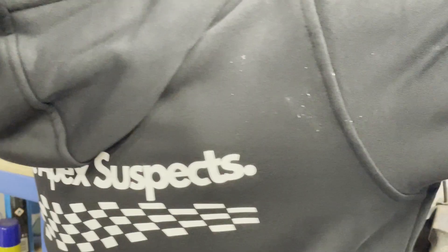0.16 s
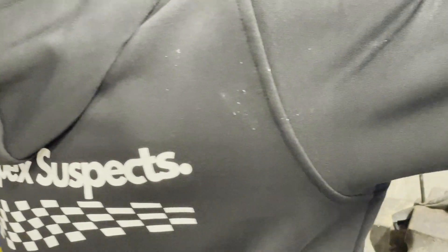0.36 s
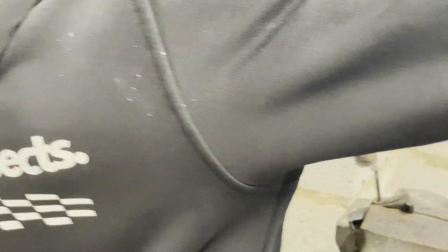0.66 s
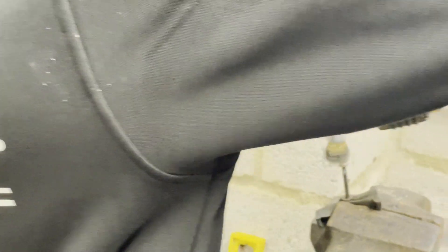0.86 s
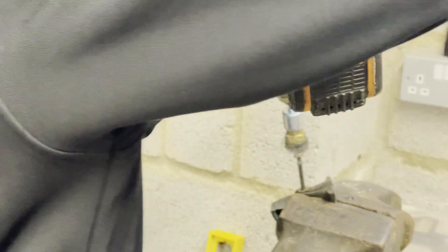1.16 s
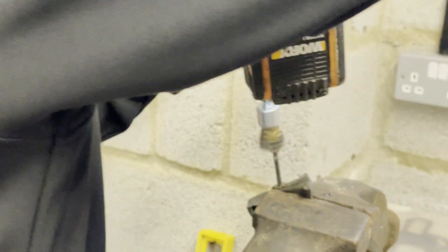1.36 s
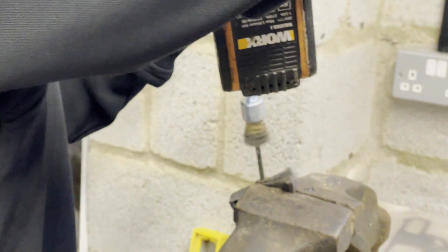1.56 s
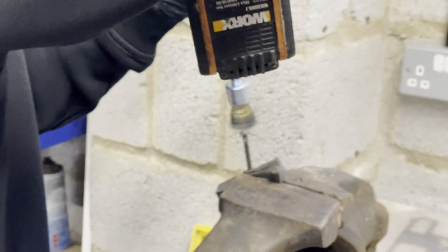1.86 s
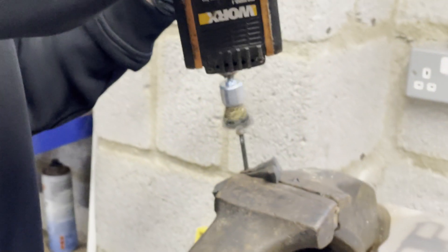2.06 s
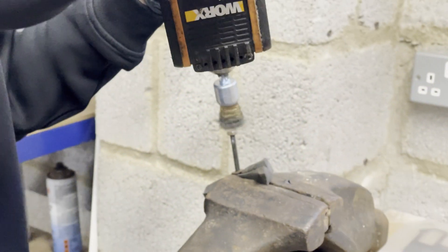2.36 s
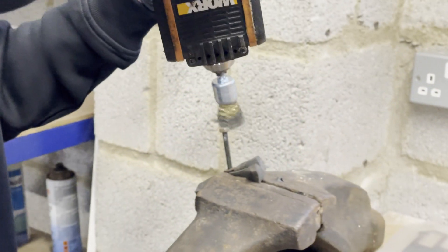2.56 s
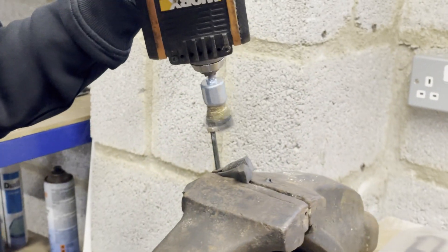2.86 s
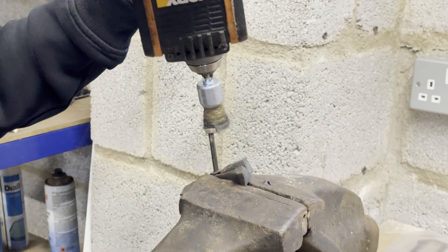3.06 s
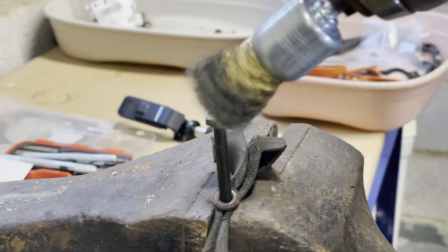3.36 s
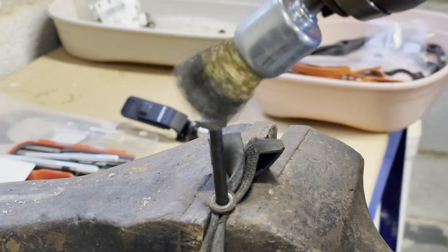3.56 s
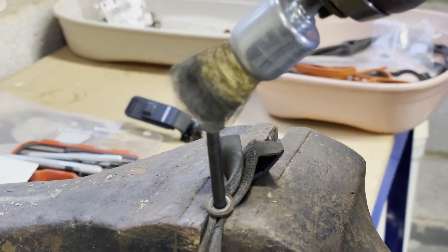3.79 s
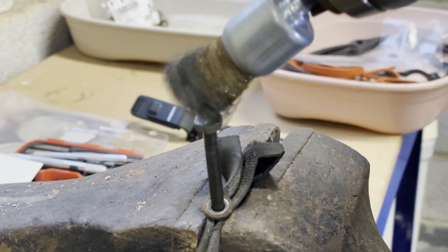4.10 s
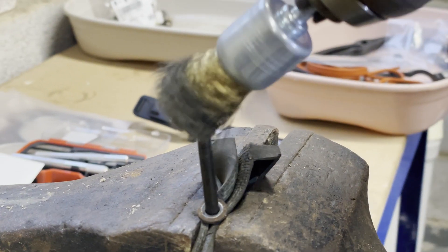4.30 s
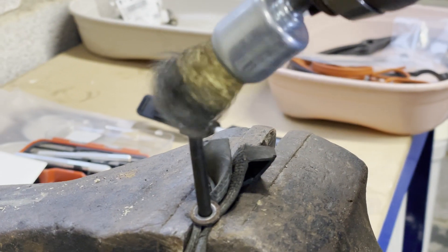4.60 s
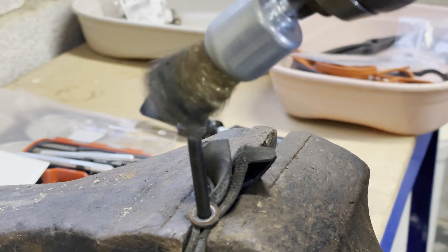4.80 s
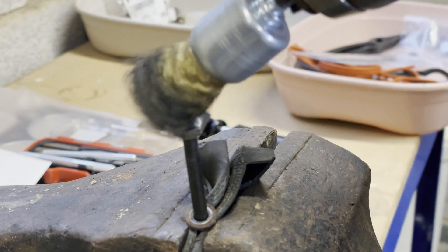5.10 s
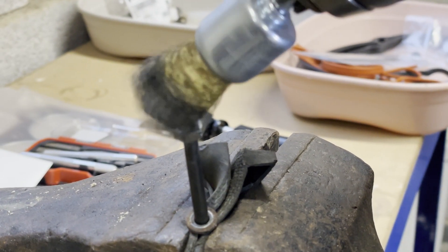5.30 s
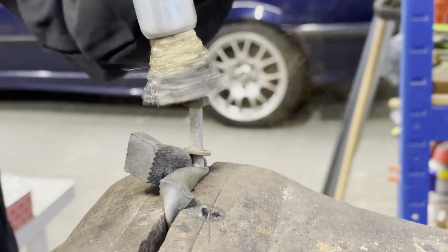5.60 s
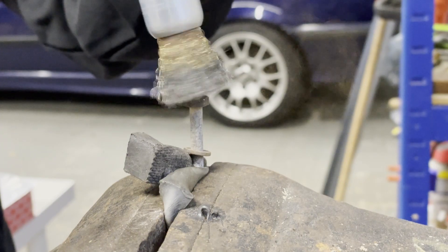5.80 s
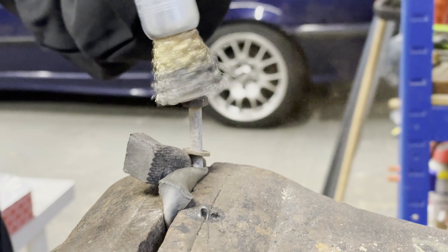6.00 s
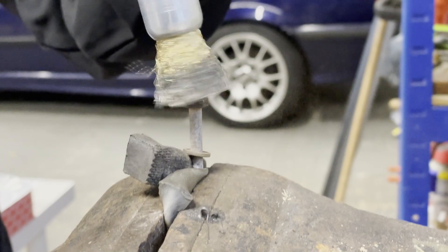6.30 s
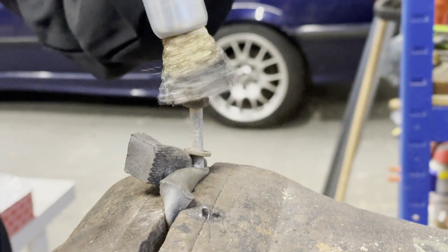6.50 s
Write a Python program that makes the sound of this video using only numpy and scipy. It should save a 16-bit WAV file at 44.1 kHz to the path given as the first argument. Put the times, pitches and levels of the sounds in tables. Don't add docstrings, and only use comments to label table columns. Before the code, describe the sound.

Continuous metallic wire-brush scouring with a steady drill hum and thin gear whistle, its tone changing abruptly twice in a workshop.

```python
import sys
import numpy as np
from scipy import signal
from scipy.fft import rfft, irfft, next_fast_len
from scipy.io import wavfile
from scipy.ndimage import uniform_filter1d

SR = 44100
rng = np.random.default_rng(int(sys.argv[2]) if len(sys.argv) > 2 else 0)


def to_wav(s):
    ch = np.atleast_2d(s).T
    pcm = np.round(np.clip(ch, -1, 1) * 32767)
    wavfile.write(sys.argv[1], SR, pcm.astype(np.int16))


def volts_from_decibels(level):
    exponent = np.asarray(level, float) / 20
    return 10 ** exponent


N = 293265

POSITION_STARTS = [
    .1657,
    3.4015,
    5.372,
    6.65,
]
# time_s, push_db above the usual
HAND_PRESSURE = [
    [(0.17, 0), (0.6, -0.1), (0.95, 0.5), (1.2, 1.0), (1.6, -0.1), (2.2, -0.2), (2.7, 0), (3.4, 0.5)],
    [(3.4, -0.8), (3.7, -0.9), (4.1, 0), (4.5, 0.1), (5.0, 0.9), (5.37, 0.7)],
    [(5.37, 0.5), (5.9, 0.14), (6.4, 0), (6.65, -0.9)],
]
# time_s, shaft_hz
SHAFT_SPEED = [
    [(0.17, 385.2), (0.5, 386.0), (1.35, 384.3), (1.6, 385), (2.3, 384.3), (3.4, 385)],
    [(3.4, 381), (3.55, 379.9), (3.87, 379.8), (3.96, 378.9), (4.5, 380.2), (4.9, 379.4), (5.37, 379.45)],
    [(5.37, 387), (5.6, 388.1), (5.72, 389), (6.2, 388.8), (6.65, 388.0)],
]
# scrape_db, low_shift_db, high_shift_db, rumble_db
USUAL_LEVELS = [
    (-29.5, 0.36, 0.33, -54),
    (-27, -0.2, 0.03, -58),
    (-28, 0.1, 1.2, -56.5),
]
THROB_DEPTH = [0.033, .08, 0.11]
# freq_hz, level_db
BODY_COLOUR = [
    [(199, -19), (400, -16.5), (635, -6), (930, -8), (1189, -0.5), (1561, -0.5), (1813, -5), (3519, -8),
     (6119, -8), (7679, -10.5), (9880, -10.5), (10999, -12), (15640, -10.5)],
    [(199, -20.5), (594, -4), (956, -10.7), (1205, -2), (1717, -8.5), (2380, -0.5), (2690, -10),
     (5520, -6.5), (8480, -7), (11640, -0.5), (13799, -5.5), (14440, -6), (15640, -1)],
    [(199, -35.5), (354, -13.5), (497, -12), (671, -1), (943, -9.5), (1173, -3.5), (1914, -8),
     (2413, -10.5), (3280, -7.5), (7119, -3), (8120, -0.5), (9520, -6.5), (15640, -3.5)],
]
# ring_hz, width_hz, level_db
STEEL_RINGS = [
    [(194, 50, -4.5), (446, 23, 4.5), (760, 330, 3), (2396, 170, 3.5), (3460, 410, 4), (3840, 110, 4.5),
     (5240, 595, 0.7), (6900, 50, 2), (9870, 337, 2.5), (13153, 529, 2), (15674, 174, 2.0)],
    [(703, 31, 2), (1430, 130, 0.9), (2240, 127, 2), (2890, 490, 5), (3300, 170, 6), (3820, 112, 4.5),
     (4860, 540, 4.0), (7040, 370, 5), (8060, 370, 3.5), (9200, 230, 4), (13200, 310, 4)],
    [(193, 66, 14), (1120, 50, 1.5), (1640, 223, 2.5), (2395, 520, 7.5), (2993, 145, 6.5), (3620, 180, 3.5),
     (6260, 184, 2.5), (8900, 189, 0), (9911, 321, 2.5), (13580, 457, 2.2), (14175, 153, 3.0)],
]
# freq_hz, level_db
PORT_RESONANCES = [(2513, -6.5), (3120, 0.0), (3359, -5), (4640, -7), (5520, -4.5), (6320, -10.5),
                   (7080, -12), (7639, -5.5), (9000, -9.5), (9800, -1), (10479, -10), (12039, -12.5),
                   (13479, -8.5), (15640, -15.5)]
# freq_hz, level_db
DIFFUSE_SHARE = [(60, -6), (300, -12), (800, -8.5), (1400, -15.5), (2000, -30), (3300, -16), (7000, -19),
                 (8700, -26), (11500, -8), (13050, -11), (13250, -50)]
# freq_hz, loss_db
SHADOW_LOSS = [(400, -2.5), (700, -0.5), (2000, -2), (3000, 0), (4500, -1.5), (7500, -1), (10000, -4),
               (15000, -4.5)]
# dip_hz, width_hz, level_db
SHADOW_DIPS = [(537, 90, -11), (900, 280, -3.5), (1350, 320, -0.5), (1670, 170, -5), (3500, 450, -5.5),
               (6200, 900, -1.5)]
WHISTLE_ORDERS = (1, 17, 34)
# hum_db, mesh_db, octave_db, mesh_fade_db
WHISTLE_LEVELS = [
    (-42, -45.5, -59, 12),
    (-41.5, -51, -35, 6),
    (-43.5, -38, -50, 0),
]
# shaft multiple (turns), level_db
WEAK_ORDERS = [
    [(2, -56), (8, -47)],
    [(4, -46.5), (6, -53), (8, -51)],
    [(3, -51), (4, -45.5), (8, -53), (20, -53)],
]
# freq_hz, lead_rad
PORT_LEAD = [(2350, 0), (2850, 0.6), (4300, 0.4), (5080, 0.76), (5780, -1.85), (6800, -0.1), (7520, -2),
             (8250, -2.5), (8430, -3), (8880, -3.5), (9080, -3.5), (10000, -4), (13100, -6), (13200, -6)]
# freq_hz, left_lead_rad, left_over_right_db
DRILL_PLACE = [
    [(300, 0.048, -2), (600, 0.13, -1.5), (1300, 0, 0), (1810, 0.17, 2.5), (3000, 0.052, 0.5),
     (4200, 0.17, -0.5), (5000, 0, 0.5)],
    [(300, -0.46, -1.5), (650, -0.65, -1.5), (1320, -0.66, 2), (1920, -0.19, 0.5), (3220, -0.048, 0),
     (3600, -0.083, 0), (5000, -0.0098, 0)],
    [(300, -0.23, -1.5), (854, 0.71, 4.5), (1300, 0.28, 2.5), (1800, 0, -1), (3000, -0.046, 0.5),
     (4200, 0.036, -0.5), (5000, -0.051, 0)],
]
# freq_hz, level_db
RUMBLE_COLOUR = [
    [(15, -30), (28, -11), (52, -1.5), (90, -6.5), (150, -10.5), (200, -12), (300, -40)],
    [(20, -35), (35, -14), (65, 1), (100, 2), (150, -3), (200, -9), (300, -33)],
    [(15, -30), (28, -12), (60, 2), (100, -2.5), (150, -7), (200, -14), (300, -40)],
]


def evened(x):
    return x / np.sqrt(np.mean(x ** 2) + 1e-20)


def read(points, hz):
    f, *columns = np.transpose(points)
    return [np.interp(np.log(hz + 1), np.log(f + 1), c) for c in columns]


def follow(rows, t):
    s, *columns = np.transpose(rows)
    return [np.interp(t, s, c) for c in columns]


def spectrum_hz(n):
    return np.fft.rfftfreq(n, 1 / SR)


def peaks_db(table, hz):
    return sum(db / (1 + (2 * (hz - peak_hz) / width_hz) ** 2) for peak_hz, width_hz, db in table)


def wander(top_hz, n):
    draw = rfft(rng.standard_normal(n // 32 + 2))
    hz = np.linspace(0, SR / 64, len(draw))
    coarse = irfft(draw / (1 + (hz / top_hz) ** 2))
    return np.interp(np.arange(n) / 32, np.arange(len(coarse)), evened(coarse - coarse.mean()))


def wires(turns, throb, per_s=12000, spread_db=2.5, hiss=1.2, press_db=0.35, flick_db=0.56):
    n = len(turns)
    force = volts_from_decibels(spread_db * np.minimum(rng.exponential(1, n), 5)) * rng.choice([-1., 1.], n)
    strikes = evened(force * (rng.random(n) < per_s / SR))
    shower = evened(strikes + hiss * rng.standard_normal(n))
    rocking = volts_from_decibels(press_db * wander(21, n) + flick_db * wander(190, n))
    gear_beat = 1 + throb * np.cos(2 * np.pi * turns / 4)
    return shower * rocking * gear_beat


def patchy(x, patchy_db=1.9):
    z = signal.stft(x, nperseg=2048)[2]
    patches = uniform_filter1d(rng.standard_normal(z.shape), size=2, axis=0)
    patches = uniform_filter1d(patches, size=34, axis=1, mode="wrap")
    return signal.istft(z * volts_from_decibels(patchy_db * evened(patches)), nperseg=2048)[1][:len(x)]


def scrape(k, t, turns, low_hz=195, deep_hz=577, warm_hz=1750, bright_hz=6500, edge_hz=3450, deep_factor=2.8):
    n, hz = len(t), spectrum_hz(len(t))
    colour_db = read(BODY_COLOUR[k], hz)[0] + peaks_db(STEEL_RINGS[k], hz) + read(PORT_RESONANCES, hz)[0]
    colour = volts_from_decibels(colour_db) / np.sqrt(1 + (low_hz / (hz + 1)) ** 8)
    direct = rfft(patchy(wires(turns, THROB_DEPTH[k]))) * colour
    loose = rfft(rng.standard_normal(n)) * colour * volts_from_decibels(read(DIFFUSE_SHARE, hz)[0])

    push_db = follow(HAND_PRESSURE[k], t)[0]
    usual_db, low_db, high_db, _ = USUAL_LEVELS[k]
    warmth_db = low_db - 0.1 * push_db
    sheen_db = high_db - 0.2 * push_db
    presence = irfft(direct * (hz > 1800) * (hz < 6000), n)
    scale = volts_from_decibels(usual_db + push_db) / np.std(presence)

    deep = 1 / (1 + (hz / deep_hz) ** 14)
    low = 1 / (1 + (hz / warm_hz) ** 4)
    high = 1 / (1 + (bright_hz / (hz + 1)) ** 4)
    edge = 0.58 * np.exp(-((hz - edge_hz) / 170) ** 2)
    parts = irfft(direct * np.array([deep + edge, low - deep, 1 - low - high - edge, high]), n)
    shifts_db = np.array([deep_factor * warmth_db, warmth_db, 0 * t, sheen_db])
    return scale * (volts_from_decibels(shifts_db) * parts).sum(0), scale * irfft(loose, n)


def cover(t):
    return np.exp(-((t - POSITION_STARTS[0]) / 0.94) ** 1.3)


def shade(pair, t):
    hz = spectrum_hz(len(t))
    shadow_db = read(SHADOW_LOSS, hz)[0] + peaks_db(SHADOW_DIPS, hz)
    shadowed = irfft(rfft(pair) * volts_from_decibels(shadow_db), len(t))
    return pair + cover(t) * (shadowed - pair)


def tone_levels(k, t, fade_s=2.13, fade_every_s=1.05):
    hum_db, mesh_db, octave_db, fade_db = WHISTLE_LEVELS[k]
    hidden = cover(t)
    away = np.cos(np.pi * (t - fade_s) / fade_every_s) ** 6
    hum_db = hum_db - 12.5 * hidden
    mesh_db = mesh_db - 6 * hidden - fade_db * away
    octave_db = octave_db + 6 * hidden
    return hum_db, mesh_db, octave_db


def motor(k, turns, levels_db, jitter=0.0025, waver_db=0.46):
    n = len(turns)
    angle = 2 * np.pi * (turns + jitter * wander(7.7, n))
    sound = np.zeros(n)
    for order, level_db in [*zip(WHISTLE_ORDERS, levels_db), *WEAK_ORDERS[k]]:
        level = np.sqrt(2) * volts_from_decibels(level_db + waver_db * wander(25, n))
        sound += level * np.cos(round(order) * angle)
    return sound


def rumble(k, t, unlike=0.21):
    colour = volts_from_decibels(read(RUMBLE_COLOUR[k], spectrum_hz(len(t)))[0])
    a, b = rfft(rng.standard_normal((2, len(t)))) * colour
    pair = irfft(np.array([a + unlike * b, 1.15 * a - unlike * b]), len(t))
    level_db = USUAL_LEVELS[k][3] + 3.5 * cover(t) + 0.7 * wander(5, len(t))
    return evened(pair) * volts_from_decibels(level_db)


def two_ports(k, sound, loose):
    n, hz = len(sound), spectrum_hz(len(sound))
    lead, pan_db = read(DRILL_PLACE[k], hz)
    lead = lead + read(PORT_LEAD, hz)[0]
    half = np.exp(0.5j * lead) * volts_from_decibels(pan_db / 2)
    sound, loose = rfft(sound), rfft(loose)
    return irfft(np.array([half * (sound + loose), (sound - loose) / half]), n)


def position(k):
    length = round((POSITION_STARTS[k + 1] - POSITION_STARTS[k]) * SR) + 1024
    t = POSITION_STARTS[k] + np.arange(next_fast_len(length, True)) / SR
    shaft_hz = follow(SHAFT_SPEED[k], t)[0] + 0.17 * wander(9, len(t))
    turns = np.cumsum(shaft_hz) / SR
    direct, loose = shade(np.array(scrape(k, t, turns)), t)
    tones = motor(k, turns, tone_levels(k, t))
    return two_ports(k, direct + tones, loose) + rumble(k, t)


def scene():
    mix = np.zeros((2, N))
    for k in range(3):
        rest = mix[:, round(POSITION_STARTS[k] * SR):]
        sound = position(k)
        rest[:, :sound.shape[1]] = sound[:, :rest.shape[1]]
    return mix


def top_cut(x):
    return signal.sosfilt(signal.butter(12, 16110, fs=SR, output="sos"), x)


def record(dry):
    low_pass = signal.firwin(1023, 15750, window=("kaiser", 9), fs=SR)
    mix = signal.oaconvolve(dry, low_pass[None], "same")
    return top_cut(mix)


dry = scene()
out = record(dry)
to_wav(out)
```